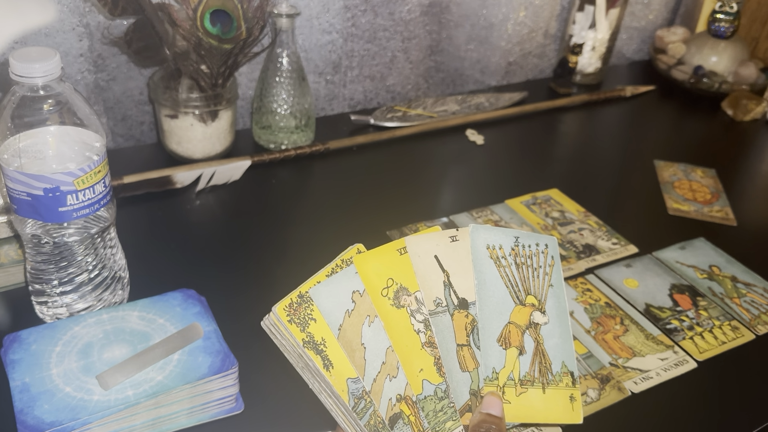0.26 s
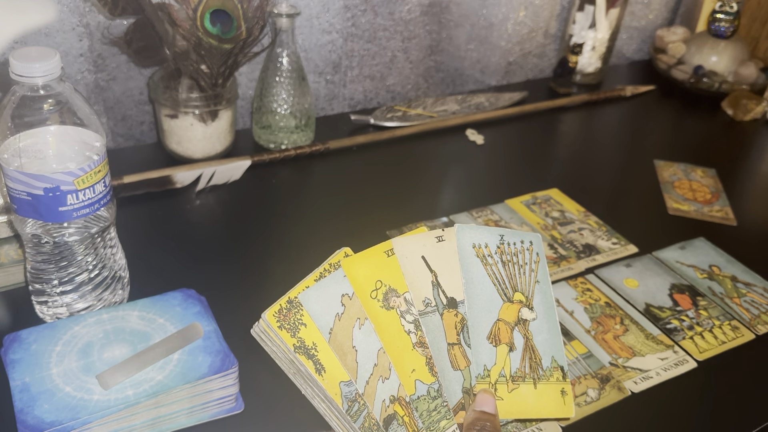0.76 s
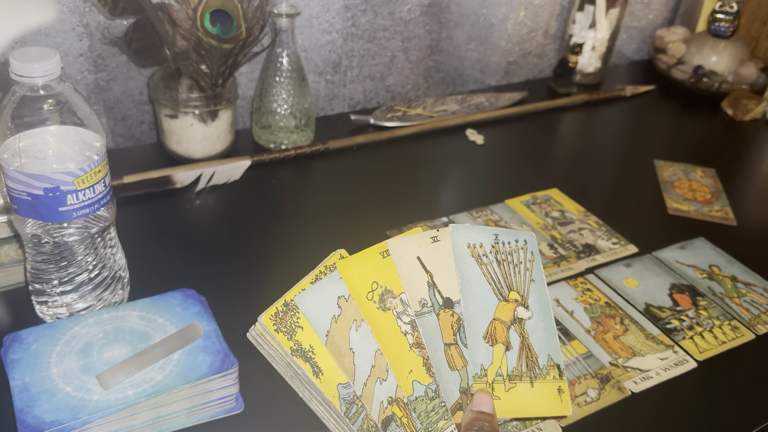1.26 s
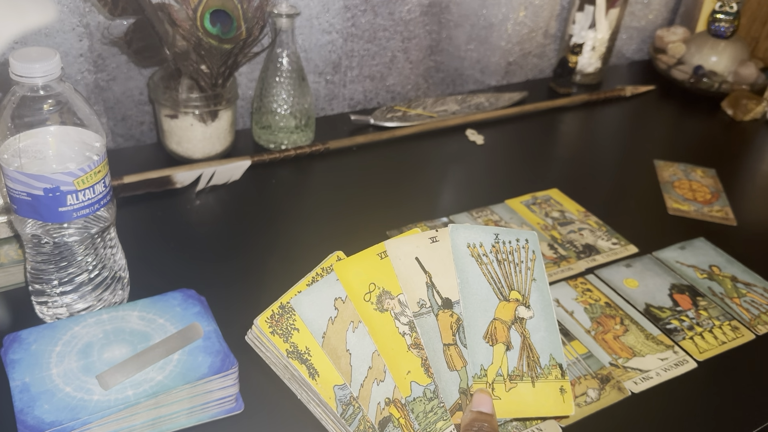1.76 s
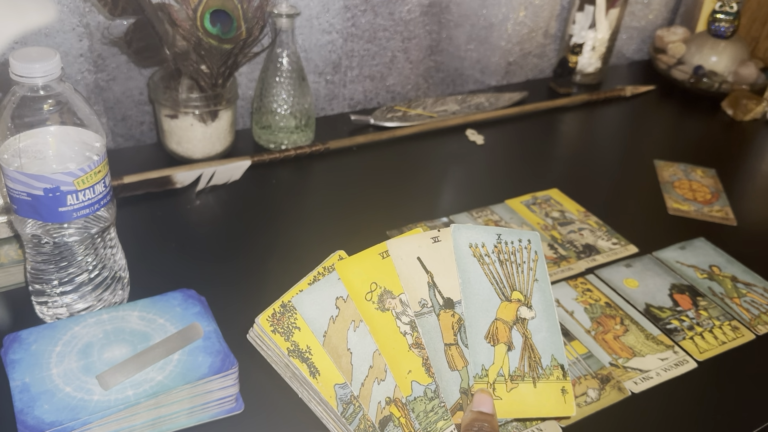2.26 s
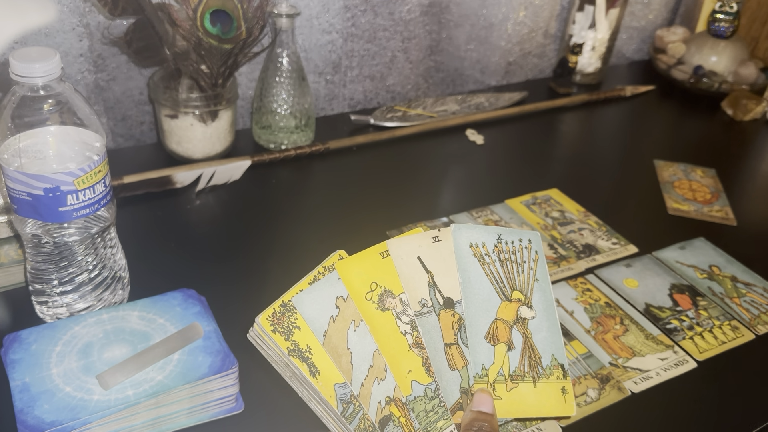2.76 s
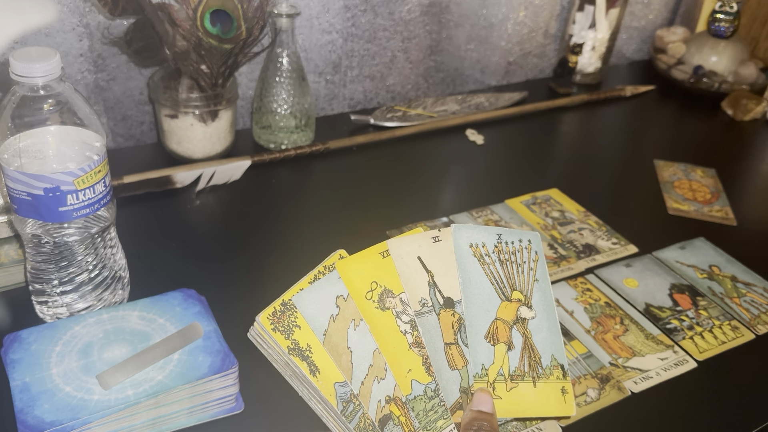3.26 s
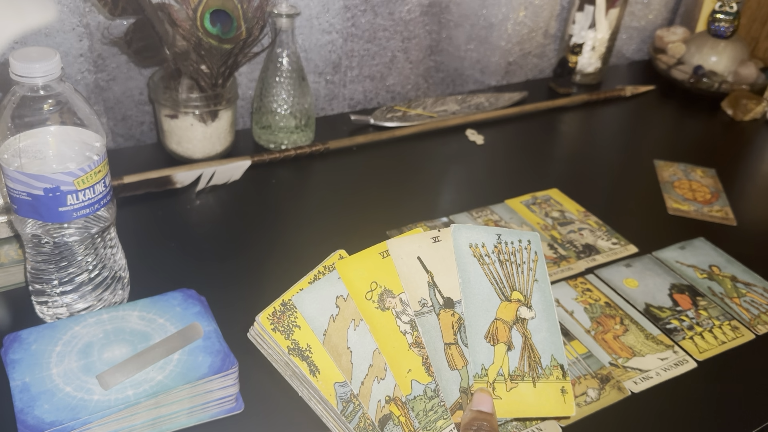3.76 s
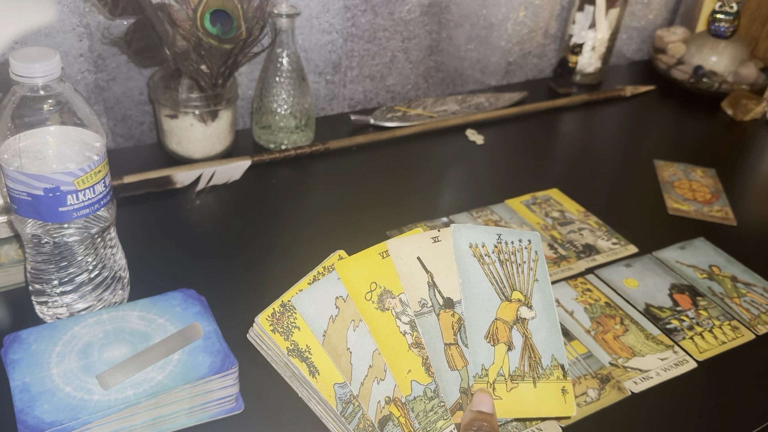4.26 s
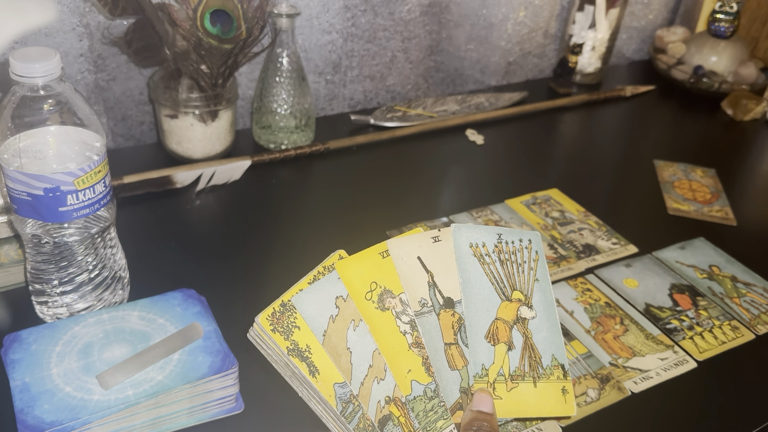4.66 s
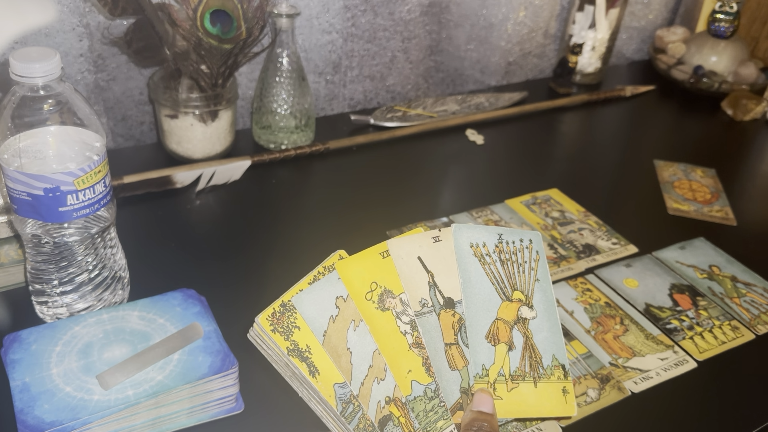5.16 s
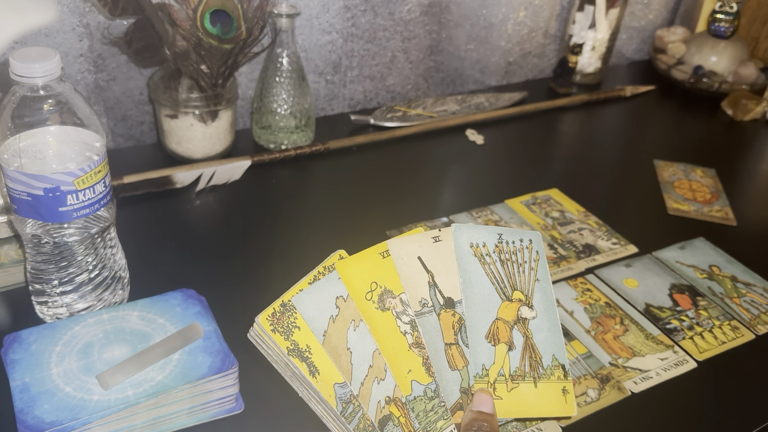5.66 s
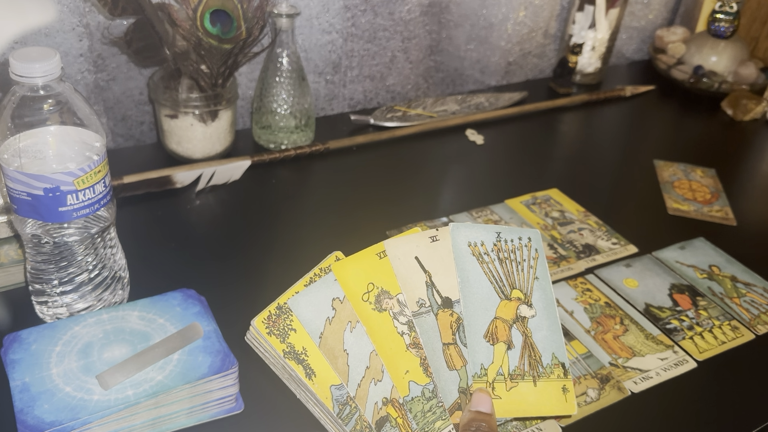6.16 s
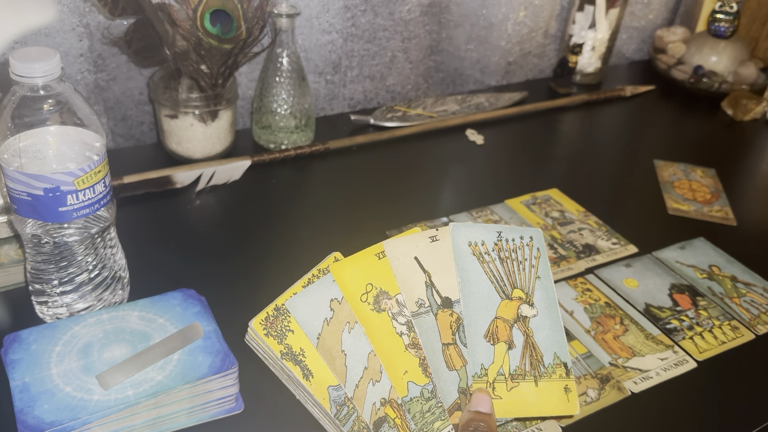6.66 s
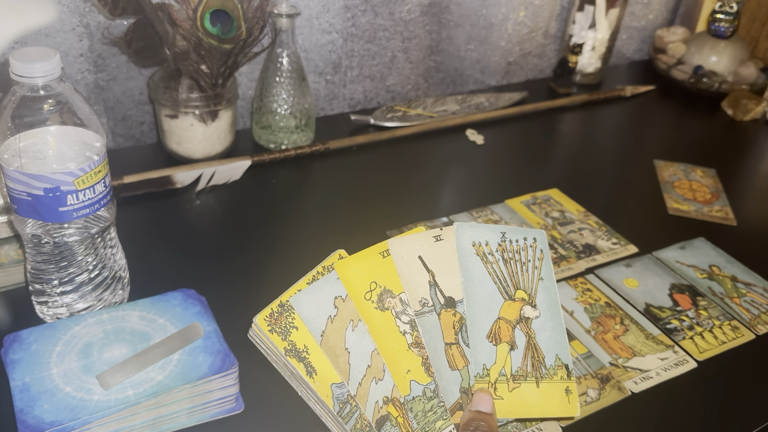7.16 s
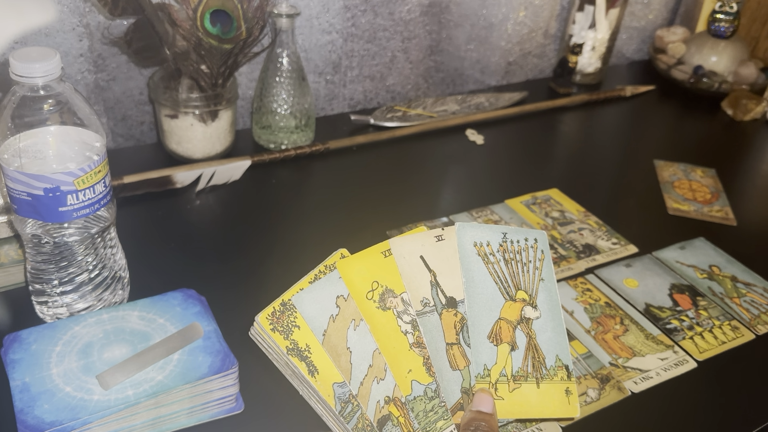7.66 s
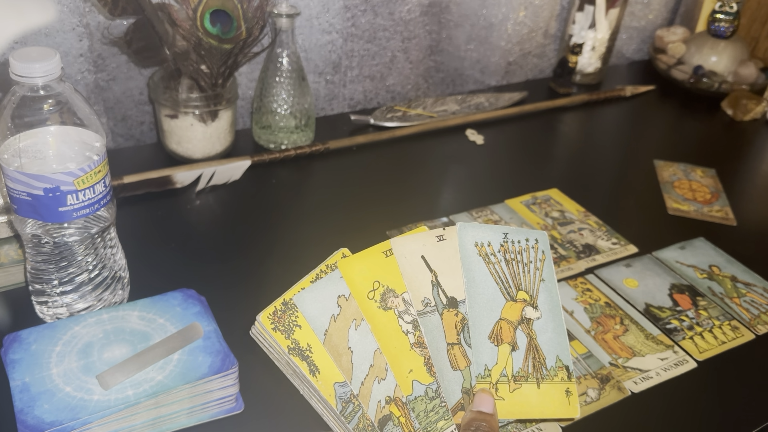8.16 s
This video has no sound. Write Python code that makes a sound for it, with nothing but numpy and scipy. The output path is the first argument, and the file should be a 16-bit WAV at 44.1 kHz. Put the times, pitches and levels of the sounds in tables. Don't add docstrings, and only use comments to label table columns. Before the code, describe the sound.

Heavy rain falls outside for the whole stretch of about eight seconds, heard from inside a closed room as a dense, low rumble with hollow drumming around the room's resonances and a soft, dull patter on glass. It is fullest at the start and eases gradually over the first several seconds, then stays steady. At about 0.03 and 0.26 seconds cards rub in a hand with faint, airy, papery strokes; near 0.37 a card snaps, a very short, dry, bright click with a tiny double edge, followed by a faint slide and low knock around 0.42. Handling then stops. Beneath the rain a low motor hum throbs about five times a second; one motor strengthens until 3.4 seconds, then winds down. Close on the left, a faint high hiss carries tiny ticks repeating between seven and eight times a second. Wide stereo, quiet microphone hiss.

```python
import sys
import numpy as np
from scipy import signal
from scipy.fft import rfft, irfft
from scipy.io import wavfile
from scipy.ndimage import uniform_filter1d

SR = 44100
rng = np.random.default_rng(int(sys.argv[2]) if len(sys.argv) > 2 else 0)


def bounce(signal):
    frames = np.transpose(np.atleast_2d(signal))
    limited = np.clip(frames, -1, 1)
    pcm = np.round(limited * 32767).astype(np.int16)
    wavfile.write(sys.argv[1], SR, pcm)


def ratio_of_db(decibels):
    return 10 ** (np.asarray(decibels, float) / 20)


N = 371322
TIME = np.arange(N) / SR
FREQ = np.fft.rfftfreq(N, 1 / SR)
PER_HZ = np.sqrt(SR / 2)


def shape(points, column=1):
    table = np.array(points, float)
    log_hz = np.log(table[:, 0])
    return ratio_of_db(np.interp(np.log(FREQ + 1), log_hz, table[:, column], left=-200, right=-200))


def walk(rate_hz):
    k = int(SR / rate_hz)
    held = np.repeat(rng.standard_normal(N // k + 1), k)
    return 1.3 * uniform_filter1d(uniform_filter1d(held, k), k)[:N]


def peak_db(peak_s, rise_db_s, fall_db_s):
    return np.where(TIME < peak_s, rise_db_s, -fall_db_s) * (TIME - peak_s)


def hum():
    # [f/Hz, level/dB, fade/(dB/s), crest t/s]
    tones = [(18.02, -93, 0, 0), (28.89, -91, 0, 0), (35.48, -79, 0, 0), (54.04, -53.8, .33, .0158),
             (59.17, -57, 0, .0137), (119.95, -65, 0, 0), (177.64, -74, 0, 0), (221.53, -69, .1, 0),
             (258.4, -62, .15, 0)]
    gain_db, sway_db = .5, .9
    labour_hz = 59.17
    out = 0
    for hz, db, fade_db_s, crest_s in tones:
        db = db - fade_db_s * TIME + sway_db * walk(1.2) + gain_db
        if hz == labour_hz:
            db = db + peak_db(3.4, rise_db_s=.9, fall_db_s=2.2)
        out = out + np.sqrt(2) * ratio_of_db(db) * np.cos(2 * np.pi * hz * (TIME - crest_s))
    return out


def lens():
    # [f/Hz, level/(dB per Hz)]
    drive_band = [(4000, -135), (4700, -123), (5300, -112), (6000, -101.5), (6600, -101), (7400, -101.5),
                  (7800, -108), (8400, -123), (9000, -142)]
    # [t/s, level/dB]
    ticks = [(.02548, -3), (.0261, -11.5), (.02707, -5.5), (.03126, -4), (.0375, -10.5), (.03818, -2.5),
             (.04067, -4.5), (.0590, -11.5), (.0925, -16.5), (.0975, -7), (.1047, -13)]
    cycle_hz, tick_db = 7.49924, 23.5
    leak_db, leak_s = -28, -.00036
    cycles = int(N / SR * cycle_hz)
    band = slice(*np.searchsorted(FREQ, [drive_band[0][0], drive_band[-1][0]]))
    turn = np.exp(-2j * np.pi * FREQ[band] / cycle_hz)
    comb = (1 - turn ** cycles) / (1 - turn + 1e-9)
    cluster = 0
    for k, (s, db) in enumerate(ticks):
        cluster = cluster + (-1) ** k * ratio_of_db(tick_db + db) * np.exp(-2j * np.pi * FREQ[band] * s)
    spectrum = rfft(rng.standard_normal(N) * ratio_of_db(.5 * walk(11)))
    spectrum[band] += comb * cluster
    spectrum *= shape(drive_band) * PER_HZ
    leak = ratio_of_db(leak_db) * spectrum * np.exp(-2j * np.pi * FREQ * leak_s)
    return np.array([irfft(spectrum, N), irfft(leak, N)])


def card_slide():
    # [f/Hz, level/dB]
    colour = [(2200, -12), (3200, 2), (4800, 8), (7000, -8), (9000, 4), (12000, 2.5), (15700, 2.5),
              (15900, -30)]
    # [t/s, level/dB]
    strokes = [
        (.03, -84.5),
        (.26, -84.5),
        (.41, -93),
    ]
    slide = irfft(rfft(rng.standard_normal((2, N))) * shape(colour), N)
    level = sum(ratio_of_db(db + peak_db(s, rise_db_s=70, fall_db_s=74)) for s, db in strokes)
    return slide / slide.std() * level


def card_snap():
    # [t/s, peak level/dB, ring f/Hz, t60/s, left minus right/dB]
    snaps = [
        (.3679, -40.5, 8400, .005, 5),
        (.3717, -54, 8500, .004, 2),
        (.3736, -45, 8500, .003, 5),
        (.3747, -56, 7100, .005, 1.5),
        (.3689, -62, 4300, .003, 2),
        (.4266, -59, 1900, .004, 1.5),
        (.3742, -63, 13500, .004, 0),
        (.3742, -62, 10600, .004, 2),
        (.4266, -62, 3000, .003, 1.5),
        (.3685, -62, 2300, .003, 2),
    ]
    tail_db, tail_t60_s, edge_db, lag_s = -27, .15, -22, .00027
    knock_below_hz = 3500
    out = np.zeros((2, N))
    t = TIME[:SR // 4]
    for s, db, hz, t60_s, pan_db in snaps:
        band = signal.butter(2, [.75 * hz, 1.25 * hz], "band", fs=SR, output="sos")
        scatter = signal.sosfilt(band, rng.standard_normal((2, len(t))))
        scatter = scatter * np.exp(-np.log(1000) * t / tail_t60_s)
        ring = np.sin(2 * np.pi * hz * t) + 0.34 * np.sin(2 * np.pi * 1.1 * hz * t)
        ring = ring + ratio_of_db(edge_db) * np.sin(2 * np.pi * 1.65 * hz * t)
        ring = ring * np.exp(-np.log(1000) * t / t60_s) * (1 - np.exp(-t / .00016))
        late_ring = np.roll(ring, int(lag_s * SR * (hz > knock_below_hz)))
        pan = ratio_of_db(db + np.array([[pan_db], [-pan_db]]) / 2)
        i = int(s * SR)
        out[:, i:i + len(t)] += pan * (np.array([late_ring, ring]) + ratio_of_db(tail_db) * scatter)
    return out


def drops():
    drops_per_s, spread_db = 4000, 1.6
    hit = rng.random(N) < drops_per_s / SR
    x = hit * rng.standard_normal(N) * ratio_of_db(spread_db * rng.exponential(size=N))
    return rfft(x / x.std())


def way_in():
    room_t60_s, echo_hz, echo_octaves, echo_share = .3, 1100, .8, .3
    t = TIME[:SR // 2]
    x = rng.standard_normal(len(t)) * np.exp(-np.log(1000) * t / room_t60_s)
    echoes = rfft(x / np.sqrt(np.sum(x ** 2)), N)
    wet = echo_share * np.exp(-(np.log2((FREQ + 1) / echo_hz) / echo_octaves) ** 2)
    return np.sqrt(1 - wet) + np.sqrt(wet) * echoes


def modes(table):
    out = np.zeros((2, 40000), complex)
    f = FREQ[:40000] + 1e-3
    for hz, width_hz, left_db, right_db, lag_rad in table:
        ring = 1 / (1 + 1j * (f / hz - hz / f) * hz / (1.55 * width_hz)) ** 2
        drive = rng.standard_normal(len(f)) + 1j * rng.standard_normal(len(f))
        ports = np.array([[ratio_of_db(left_db) * np.exp(-1j * lag_rad)], [ratio_of_db(right_db)]])
        out += ring * drive * ports
    return irfft(out * np.sqrt(N / 2) * PER_HZ, N)


def patter():
    # [f/Hz, left level/(dB per Hz), right level/(dB per Hz)]
    colour = [(25, -104, -104), (60, -84, -84), (190, -83, -83), (310, -87, -89), (450, -94, -95),
              (650, -101, -102), (900, -108, -108), (1300, -110, -110), (2000, -109, -116),
              (2800, -114, -121), (3400, -115, -121), (4500, -120, -121), (4700, -121, -125),
              (5400, -124, -126), (7500, -130, -134)]
    near_share, port_lag_s = 0.38, .00007
    near = drops()
    alike = 1 / (1 + (FREQ / 260) ** 4)
    common = drops() * way_in()
    out = []
    for column, lag_s in ((1, 0), (2, port_lag_s)):
        late = np.exp(-2j * np.pi * FREQ * lag_s)
        port = np.sqrt(near_share) * near * late + np.sqrt(1 - near_share) * drops()
        port = np.sqrt(alike) * common + np.sqrt(1 - alike) * port * way_in()
        out.append(irfft(port * shape(colour, column), N))
    return np.array(out) * PER_HZ


def rain():
    # [f/Hz, width/Hz, left level/(dB per Hz), right level/(dB per Hz), left lag/rad]
    rumble_modes = [(38, 8, -74.5, -76, .2), (51.4, 6.2, -73, -74.5, 0.041), (76.8, 26, -69.5, -71, 0.078),
                    (124.1, 12.1, -73, -68.5, 0), (138.6, 11.8, -69.5, -71, 0.11), (164, 22.2, -73, -76, 0),
                    (224.5, 16, -84.5, -76.5, .05), (233.9, 14.3, -75, -74.5, 0.11),
                    (277.6, 30, -85, -83.5, 0.15)]
    # [f/Hz, width/Hz, left level/(dB per Hz), right level/(dB per Hz), left lag/rad]
    drum_modes = [(412.4, 17, -90, -93, 2.3), (429, 9.1, -93.5, -87, 0.1), (483, 16, -92, -88, 1.25),
                  (531, 16, -89.5, -86.5, -0.05), (552, 12, -85, -80, 1), (558.6, 8.6, -87, -89.5, 2.5),
                  (572.9, 12.3, -79, -77, 1.5), (584.1, 11.2, -83.5, -78, 0),
                  (602.2, 9.6, -82.5, -77.5, 0.45), (641.6, 16, -89, -92, 2), (673, 24, -101.5, -99, -1),
                  (720, 5.1, -98, -96.5, 0.5)]
    # [f/Hz, width/Hz, left level/(dB per Hz), right level/(dB per Hz), left lag/rad]
    pane_modes = [(806, 13, -99, -101, -2), (862, 11, -103, -105, 0.5), (918, 11, -103, -100, 3.5),
                  (927, 11, -102, -103, -1), (987, 8.3, -102, -99, 0.7), (1064, 12, -101, -96, 1.7),
                  (1214, 19, -107, -102, 2), (1438, 110, -105, -105, 2), (1484, 22, -105, -106, -2)]
    surge_db = 2 * np.exp(-TIME / 2.4)
    rumble = modes(rumble_modes) * ratio_of_db(-0.75 + 1.1 * surge_db)
    drumming = (modes(drum_modes) + modes(pane_modes)) * ratio_of_db(0.3 + 0.26 * surge_db)
    pattering = patter() * ratio_of_db(0.3 * walk(5.3)) * ratio_of_db(0.5 + 0.86 * surge_db)
    capsule = signal.butter(3, 44.9, "high", fs=SR, output="sos")
    return signal.sosfilt(capsule, rumble + drumming + pattering)


def scene():
    return hum() + lens() + card_slide() + card_snap() + rain()


def self_noise(column):
    # [f/Hz, left level/(dB per Hz), right level/(dB per Hz)]
    hiss = [(3000, -150, -145), (6000, -145, -140), (7600, -141, -137), (8400, -139, -133),
            (9300, -139, -134), (10300, -135, -134), (11500, -131, -131), (13000, -131, -131),
            (15100, -128, -128), (15200, -150, -150)]
    return irfft(rfft(rng.standard_normal(N)) * shape(hiss, column), N) * PER_HZ


def soft_spectrum(x):
    return rfft(x * signal.windows.tukey(N, 1 / 500))


def remove_quiet(x, lost):
    spared_db = -86
    power = uniform_filter1d(lost ** 2, size=256)
    return x - lost / (1 + (power / ratio_of_db(2 * spared_db)) ** 2)


def thin_treble(x, column):
    # [f/Hz, sum level/dB, difference level/dB]
    thinning = [(1, 0, 0), (10300, 0, 0), (10400, -15, 0), (12300, -15, 0), (12400, -2, -3), (13050, 0, -4),
                (13150, 0, -18), (22050, 0, -18)]
    return remove_quiet(x, irfft(soft_spectrum(x) * (1 - shape(thinning, column)), N))


def flutter(x):
    # [low f/Hz, high f/Hz, share of time lost]
    fickle_bands = [(12400, 12750, .5), (12750, 13100, .3), (13100, 13500, .12), (14450, 15200, .22)]
    spectrum, lost = soft_spectrum(x), 0
    for low_hz, high_hz, share in fickle_bands:
        off = np.repeat(rng.random(N // 2048 + 1) < share, 2048)[:N]
        band = irfft(spectrum * (FREQ >= low_hz) * (FREQ < high_hz), N)
        lost = lost + uniform_filter1d(1. * off, size=256) * band
    return remove_quiet(x, lost)


def top_cut(x):
    return signal.sosfilt(signal.butter(12, 16500, fs=SR, output="sos"), x)


def record(dry):
    left, right = dry[0] + self_noise(1), dry[1] + self_noise(2)
    mid = thin_treble((left + right) / 2, column=1)
    side = thin_treble((left - right) / 2, column=2)
    mix = flutter(np.array([mid + side, mid - side]))
    return top_cut(mix)


dry = scene()
out = record(dry)
bounce(out)
```